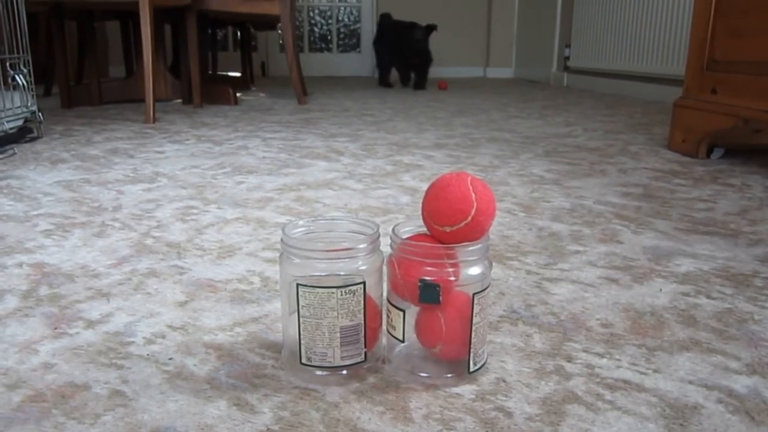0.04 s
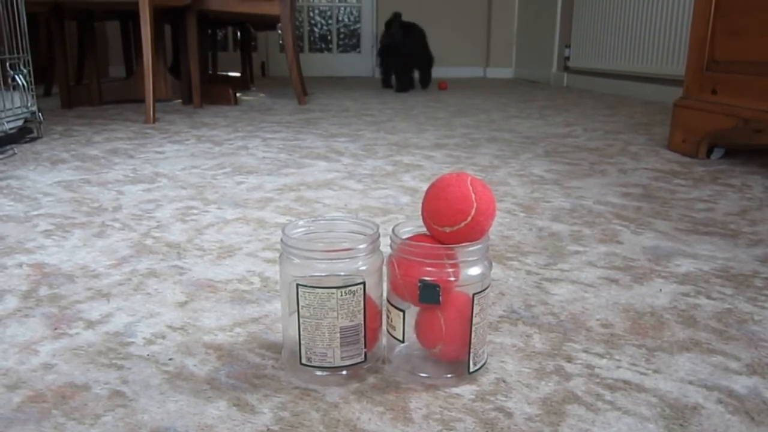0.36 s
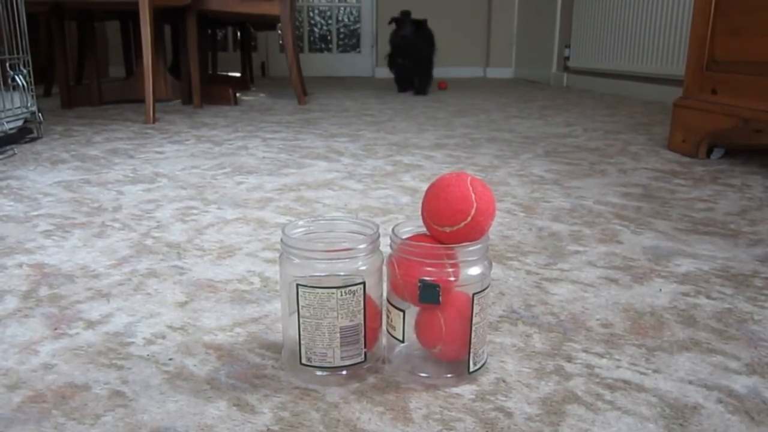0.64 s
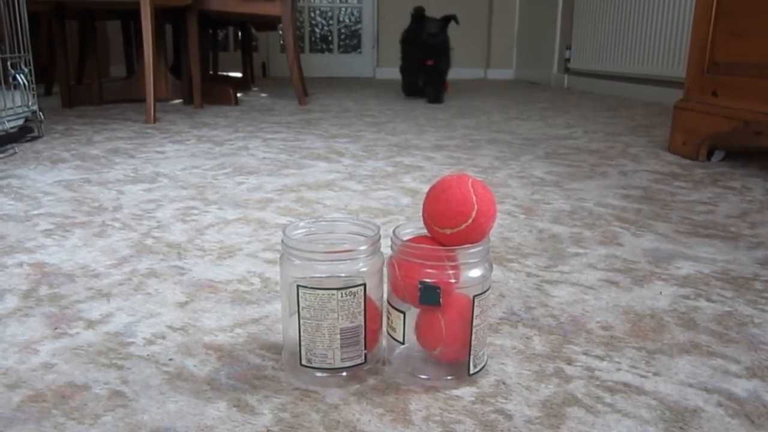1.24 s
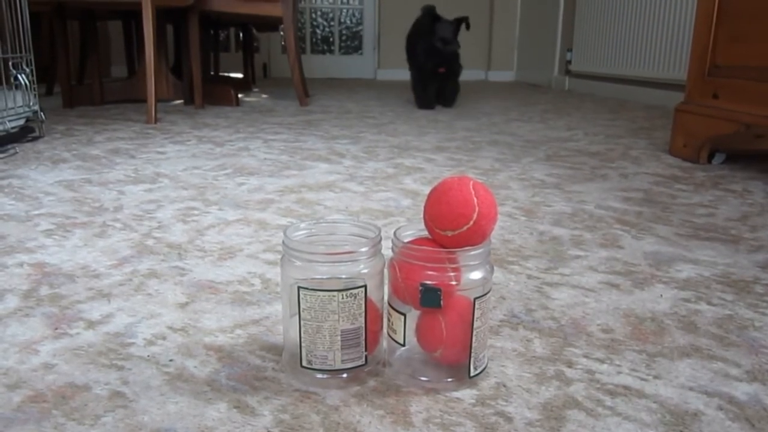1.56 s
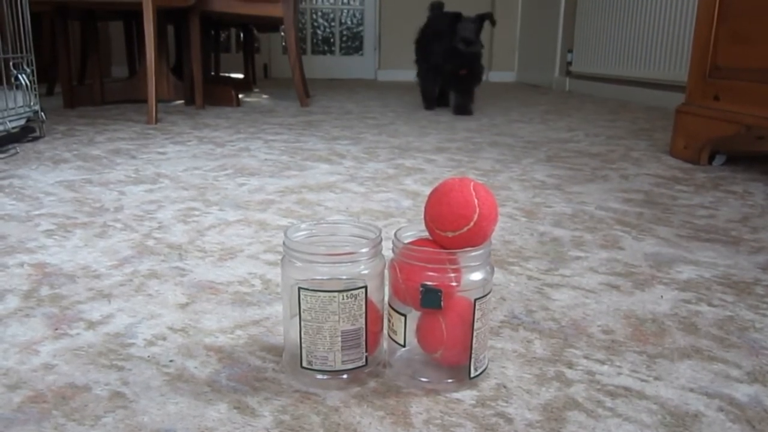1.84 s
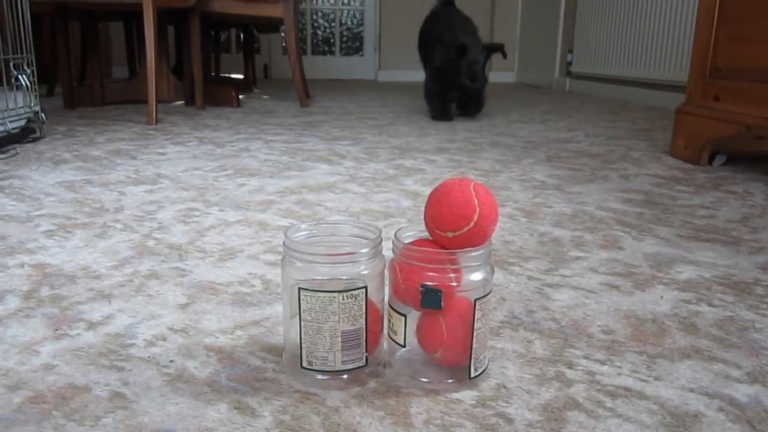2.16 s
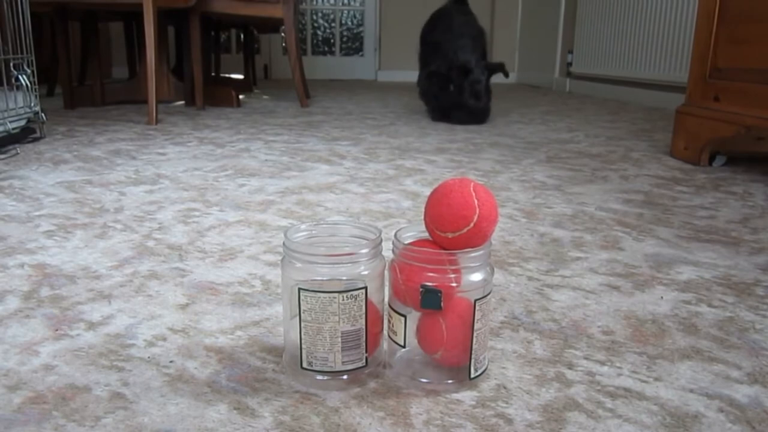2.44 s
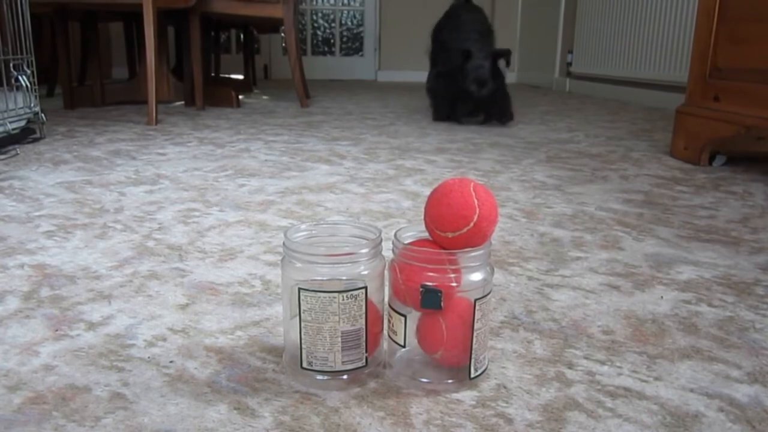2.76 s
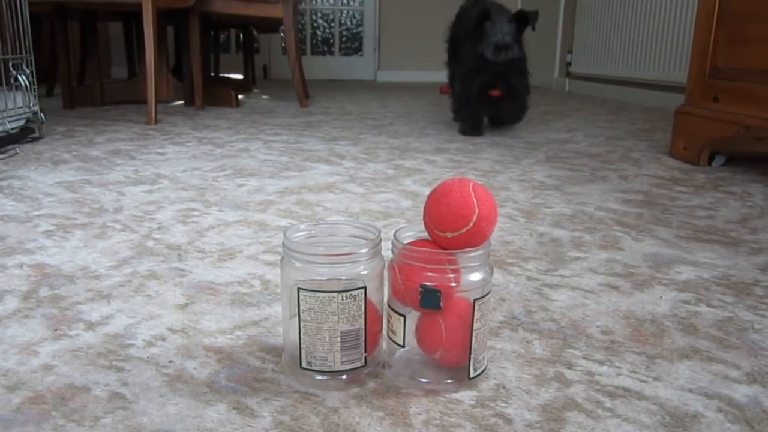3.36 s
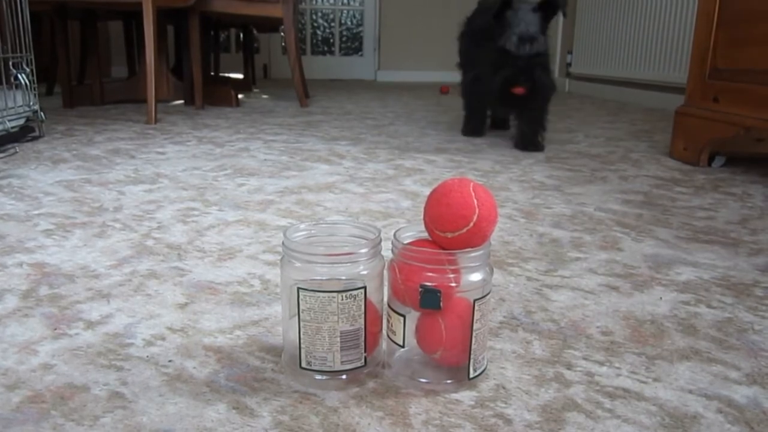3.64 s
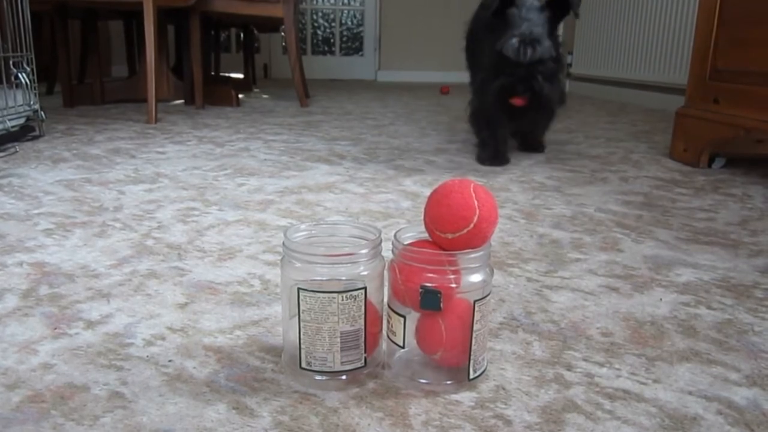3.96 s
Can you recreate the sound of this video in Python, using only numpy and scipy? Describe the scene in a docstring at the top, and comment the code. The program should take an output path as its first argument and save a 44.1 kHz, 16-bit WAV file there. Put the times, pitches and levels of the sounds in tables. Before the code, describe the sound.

A hand-held training clicker gives one sharp, bright click with a brief echo in a quiet carpeted room. Faint hiss and low rumble continue, and two soft paw thuds come at the very end.

```python
"""A training clicker snaps once in a quiet carpeted room.
The thumb seats the button, then the steel tongue buckles and rings the plastic case.
Floor, furniture and walls reflect it. Two soft thuds follow as a dog trots closer.
Background: hiss, a low rumble and a camera's faint whine."""
import sys
import numpy as np
from scipy import signal
from scipy.fft import rfft, irfft
from scipy.io import wavfile

SR = 44100
rng = np.random.default_rng(int(sys.argv[2]) if len(sys.argv) > 2 else 0)


def wrap_up_sound(samples):
    """Save the sound to the file named by the first command line argument, as 16-bit audio."""
    columns = np.atleast_2d(samples).T
    # keep every value between -1 and 1, then stretch to whole-number steps
    tamed = np.clip(columns, -1, 1)
    steps = np.round(tamed * 32767).astype(np.int16)
    wavfile.write(sys.argv[1], SR, steps)


N = 176400

# Button seating. Each row: frequency in Hz, level in dB, t60 in seconds.
BUTTON_MODES = [(324, -38, .03), (1000, -36, 0.014), (4120, -41, .007), (6100, -47, .004),
                (7360, -40, 0.0044)]
# Steel tongue and case. Each row: frequency in Hz, level in dB, t60 in seconds.
SNAP_MODES = [(392, -41, 0.023), (750, -36, 0.0075), (1970, -47, 0.0032), (2480, -49.5, 0.039),
              (2973, -42.5, 0.029), (4060, -45.5, 0.016), (4730, -41.5, .009), (5520, -37.5, 0.0067),
              (7450, -19, 0.0029), (8600, -40, .01), (8800, -43, .01), (9390, -17, 0.0018),
              (11220, -39, 0.011), (12890, -41, 0.0087)]
# Floor and furniture bounces. Each row: delay in seconds, gain in dB.
REFLECTIONS = [(.00042, -10), (.0015, -4.5), (.0047, -6), (.0077, -14), (0.0113, -6), (.0140, -12),
               (.0205, -24)]
# Diffuse reverberation. Each row: band centre in Hz, gain in dB, t60 in seconds, build-up in seconds.
ROOM_BANDS = [(150, 4, .4, .004), (400, 5, 0.16, .006), (1000, 5, 0.33, 0.0068), (2110, 12, 0.4, 0.014),
              (3100, 6, 0.26, .016), (5040, 7.5, 0.2, 0.0032), (7760, -3.5, 0.27, 0.0034),
              (11300, 5, 0.21, 0.0022), (15000, 4, .21, .006)]
# Paws on carpet. Each row: start in seconds, level in dB, pitch in Hz.
FOOTFALLS = [(3.895, -47, 62), (3.952, -39, 135)]
# Hiss spectrum. Each row: frequency in Hz, relative level in dB.
HISS_SPECTRUM = [(35, -19), (50, -4.5), (75, -6.5), (150, -9), (300, -12), (520, -15), (1100, -20),
                 (2000, -22.5), (3000, -25.5), (7000, -29.5), (10000, -32), (13000, -36), (15500, -40.5)]
# Resonances in the hiss. Each row: centre in Hz, half-width in Hz, boost in dB.
HISS_RESONANCES = [(1276, 57, 4), (1614, 58, 4), (2670, 79, 0.5), (7770, 190, 2.5)]
# Rumble envelope. Each row: time in seconds, rms level in dB.
RUMBLE_LEVELS = [(0, -51), (.8, -53.5), (1.25, -49), (1.9, -52.5), (2.35, -53.5), (2.6, -65.5),
                 (3.3, -64.5), (4, -60.5)]
# Camera whine. Each row: frequency in Hz, rms level in dB.
WHINE_TONES = [(7792, -80.5), (7853, -78.5), (7882, -76), (7941, -81), (12925, -91), (13517, -87)]

PRESS_S, SNAP_S = .8232, .8390
CONTACT_CUTOFF_HZ, PRESS_SEND_DB = 11800, -5.5
CRACK_IMPULSE_DB, CRACK_CUTOFF_HZ = -18, 9000
THUD_PEAK_S, THUD_HALF_WIDTH_S = .017, .012
SCUFF_PEAK_S, SCUFF_HALF_WIDTH_S, SCUFF_GAIN_DB, SCUFF_CUTOFF_HZ = .008, .033, -15, 800
HISS_RMS_DB = -54.5
RUMBLE_HZ, RUMBLE_HALF_WIDTH_HZ = 29.2, 6.4
WHINE_WANDER_HZ = 2.5
TOP_HZ = 15750


def clicker():
    """The button ticks, then the tongue cracks and rings the case; all three excite the room."""
    press = ring(PRESS_S, BUTTON_MODES)
    snap = ring(SNAP_S, SNAP_MODES)
    pulse = crack()
    send = snap + undb(PRESS_SEND_DB) * press
    room = reflections(send + pulse) + reverberation(send) + reverberation(pulse)
    return press + snap + pulse + room


def ring(start_s, modes):
    """Struck, damped modes of alternating sign; the blow's duration softens the top."""
    t = np.maximum(np.arange(N) - np.round(start_s * SR), 0) / SR
    ringing = sum((-1) ** k * undb(db) * decay(t, t60_s) * np.sin(2 * np.pi * hz * t)
                  for k, (hz, db, t60_s) in enumerate(modes))
    return lowpass(ringing, CONTACT_CUTOFF_HZ)


def crack():
    """One toneless pulse as the tongue buckles."""
    impulse = undb(CRACK_IMPULSE_DB) * signal.unit_impulse(N, int(SNAP_S * SR))
    return lowpass(impulse, CRACK_CUTOFF_HZ)


def reflections(x):
    """Single bounces off nearby surfaces."""
    return sum(undb(db) * np.roll(x, int(delay_s * SR)) for delay_s, db in REFLECTIONS)


def reverberation(x):
    """Dense room scatter; each band builds and decays at its own rate."""
    t = np.arange(SR // 2) / SR
    log_hz = np.log(np.maximum(np.fft.rfftfreq(len(t), 1 / SR), 1))
    log_centres = np.log([row[0] for row in ROOM_BANDS])
    scatter = rfft(rng.standard_normal(len(t)))
    tail = 0
    for weights, (_, db, t60_s, build_s) in zip(np.eye(len(ROOM_BANDS)), ROOM_BANDS):
        envelope = decay(t, t60_s) * (1 - np.exp(-t / build_s))
        band = irfft(scatter * np.interp(log_hz, log_centres, weights), len(t))
        tail += undb(db) * band * envelope / np.linalg.norm(envelope)
    return signal.fftconvolve(x, tail)[:N]


def paws():
    """Each footfall scuffs the carpet and thuds in the floor."""
    friction = noise(lambda f: rolloff(f, SCUFF_CUTOFF_HZ))
    steps = 0
    for start_s, db, hz in FOOTFALLS:
        t = np.arange(N) / SR - start_s
        thud = bell(t, THUD_PEAK_S, THUD_HALF_WIDTH_S) * np.sin(2 * np.pi * hz * t)
        scuff = undb(SCUFF_GAIN_DB) * bell(t, SCUFF_PEAK_S, SCUFF_HALF_WIDTH_S) * friction
        steps += undb(db) * (thud + scuff)
    return steps


def hiss():
    """Steady noise, slightly coloured by resonances."""
    def gain(f):
        hz, db = np.array(HISS_SPECTRUM).T
        boost_db = sum(boost * bell(f, centre, width) for centre, width, boost in HISS_RESONANCES)
        return undb(np.interp(np.log(f), np.log(hz), db) + boost_db)
    return undb(HISS_RMS_DB) * noise(gain)


def rumble():
    """Narrow, very low noise that drops in the second half."""
    times_s, db = np.array(RUMBLE_LEVELS).T
    envelope = undb(np.interp(np.arange(N) / SR, times_s, db))
    return envelope * noise(lambda f: rolloff(f - RUMBLE_HZ, RUMBLE_HALF_WIDTH_HZ))


def whine():
    """Thin, beating camera tones that wander together in pitch."""
    wander_hz = WHINE_WANDER_HZ * noise(lambda f: rolloff(f, width_hz=4))
    tones = 0
    for hz, db in WHINE_TONES:
        cycles = np.cumsum(hz + wander_hz) / SR + rng.random()
        tones += np.sqrt(2) * undb(db) * np.sin(2 * np.pi * cycles)
    return tones


def noise(gain):
    """Unit-rms noise with spectrum gain(Hz)."""
    hz = np.maximum(np.fft.rfftfreq(N, 1 / SR), 1)
    x = irfft(rfft(rng.standard_normal(N)) * gain(hz), N)
    return x / x.std()


def undb(db):
    """Decibels to gain."""
    return 10 ** (np.asarray(db) / 20)


def decay(t, t60_s):
    """Exponential fall, 60 dB in t60_s."""
    return np.exp(-np.log(1000) * t / t60_s)


def bell(x, centre, half_width):
    """Gaussian bump of height 1."""
    return np.exp(-((x - centre) / half_width) ** 2)


def rolloff(hz, width_hz):
    """Gain of 1 at zero, 1/2 at width_hz."""
    return 1 / (1 + (hz / width_hz) ** 2)


def lowpass(x, cutoff_hz):
    """Two-pole low-pass."""
    return signal.sosfilt(signal.butter(2, cutoff_hz, fs=SR, output="sos"), x)


def scene():
    """All sources, equal in both channels."""
    mono = clicker() + paws() + hiss() + rumble() + whine()
    return np.array([mono, mono])


def record(dry):
    """Steep cut above TOP_HZ."""
    return signal.sosfilt(signal.ellip(10, .1, 70, TOP_HZ, fs=SR, output="sos"), dry)


dry = scene()
out = record(dry)
wrap_up_sound(out)
```